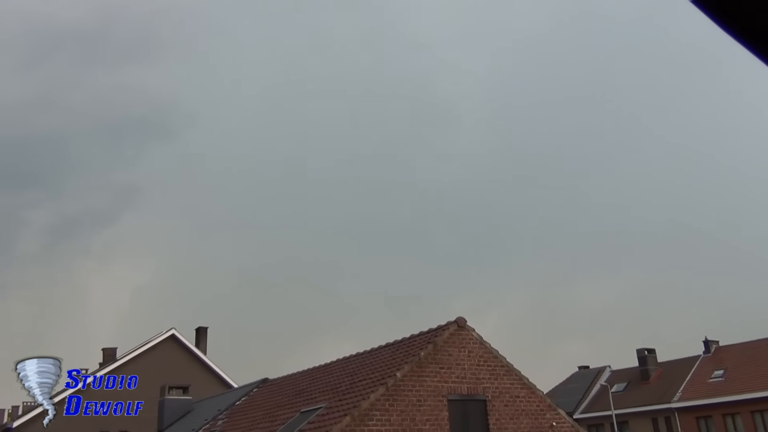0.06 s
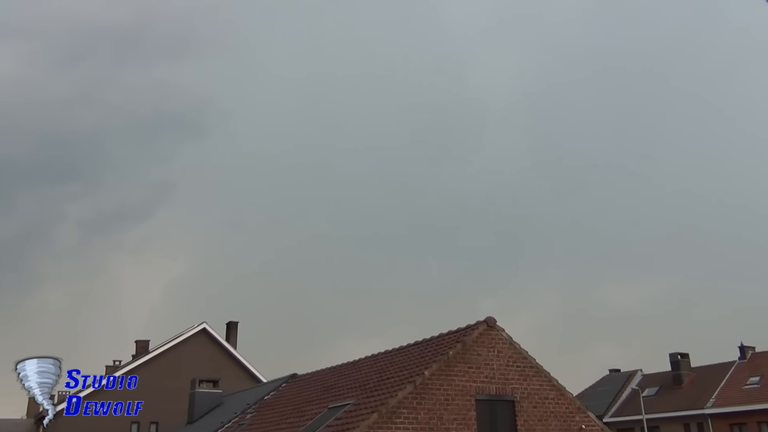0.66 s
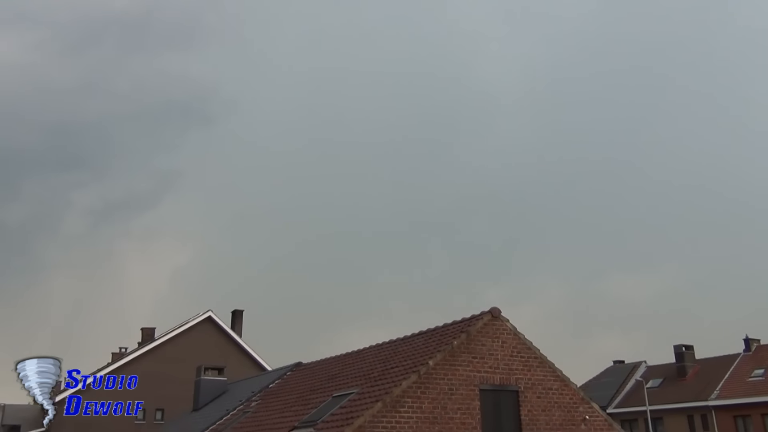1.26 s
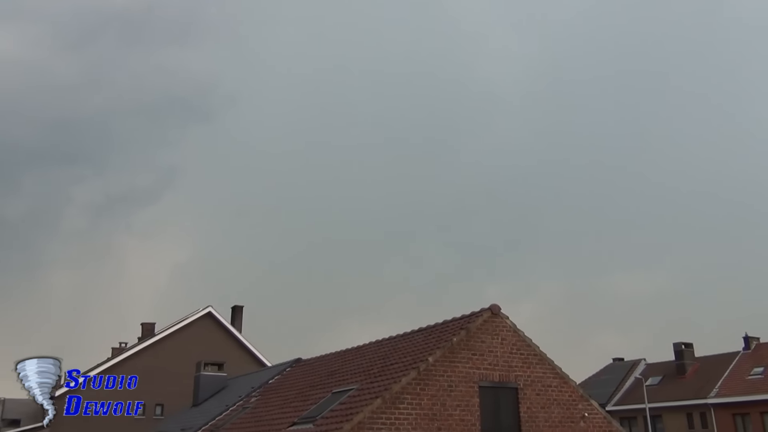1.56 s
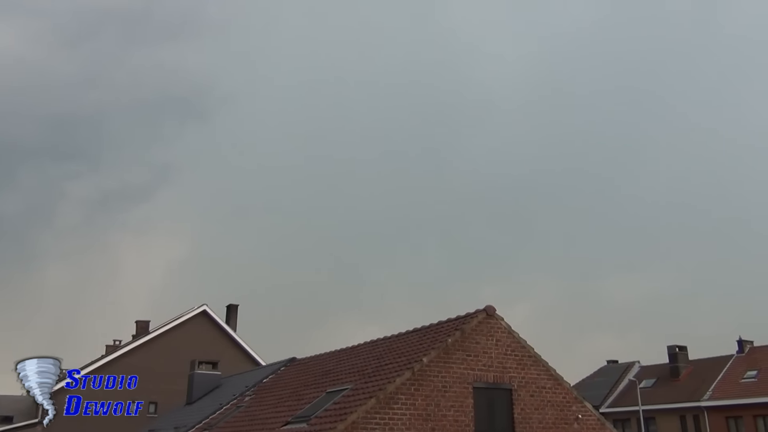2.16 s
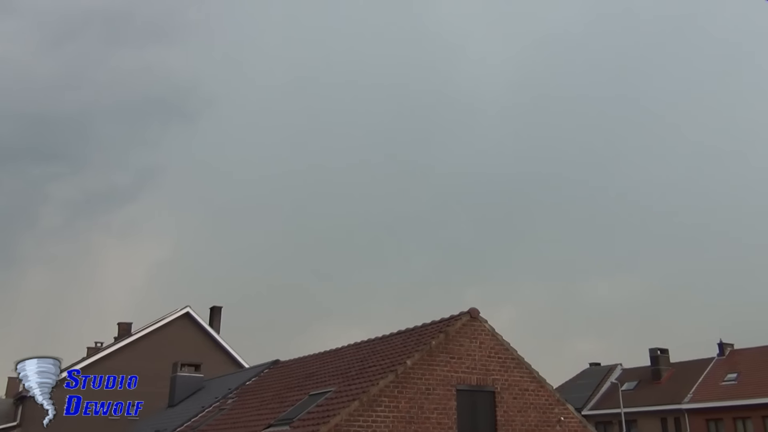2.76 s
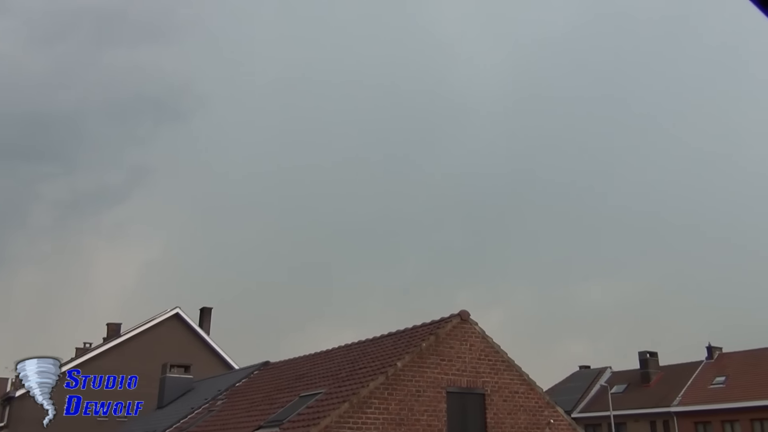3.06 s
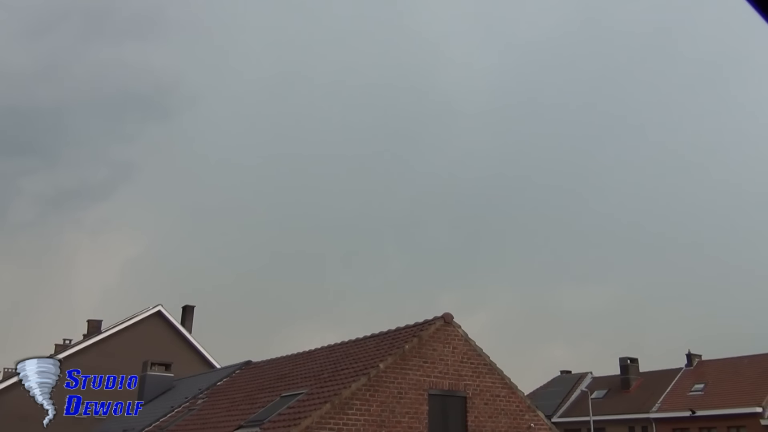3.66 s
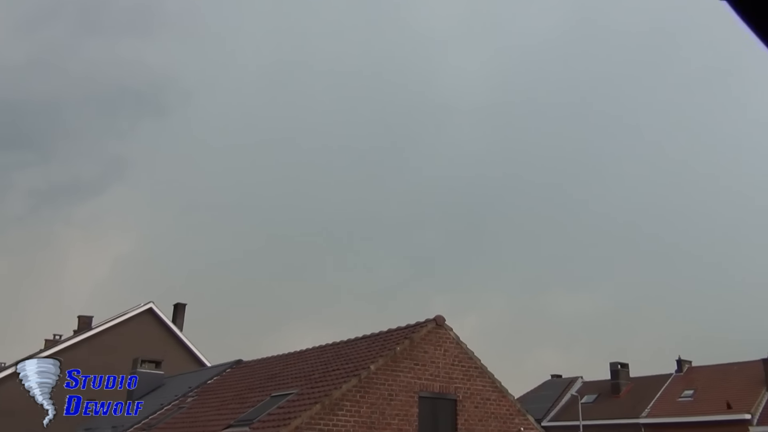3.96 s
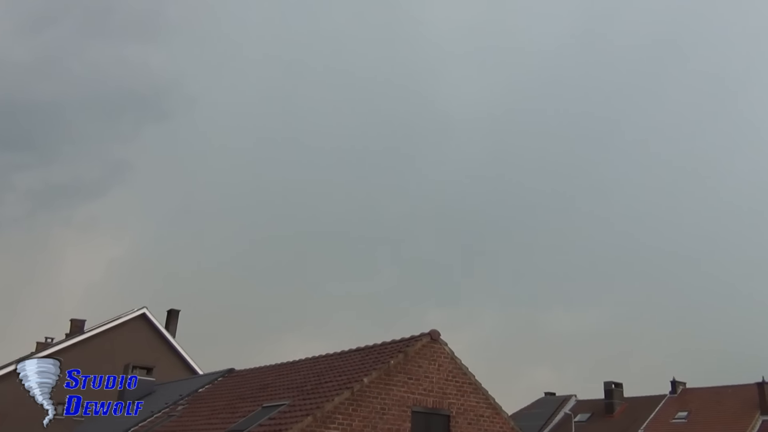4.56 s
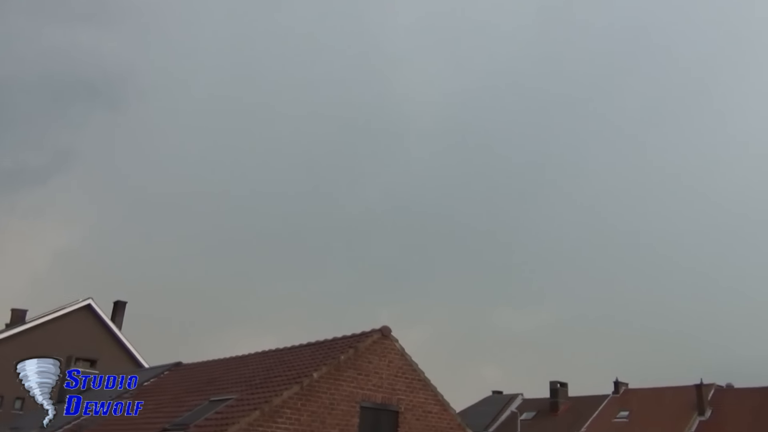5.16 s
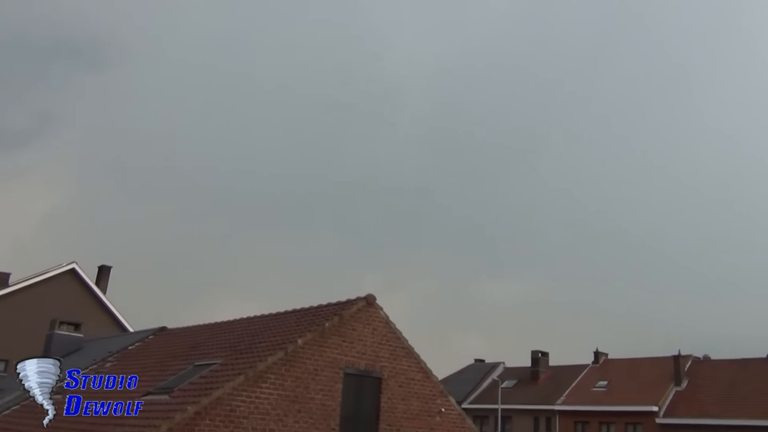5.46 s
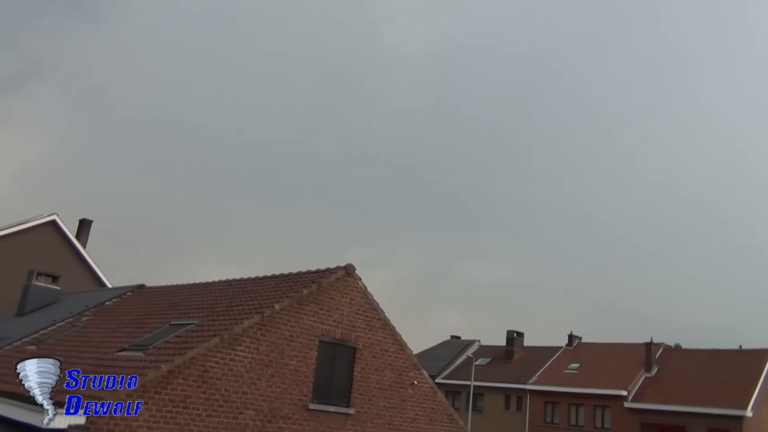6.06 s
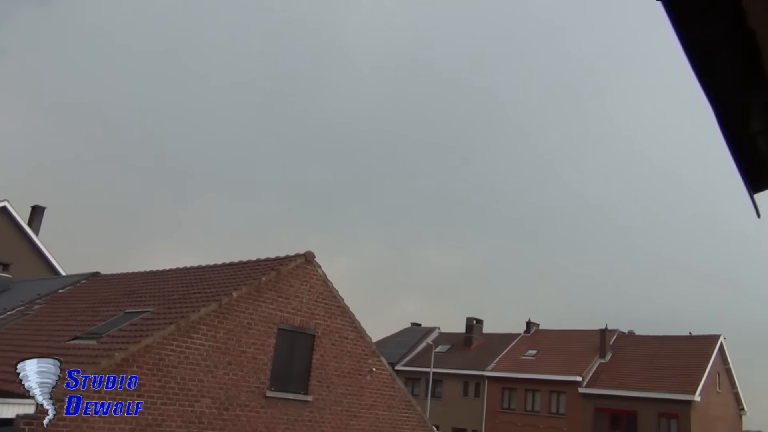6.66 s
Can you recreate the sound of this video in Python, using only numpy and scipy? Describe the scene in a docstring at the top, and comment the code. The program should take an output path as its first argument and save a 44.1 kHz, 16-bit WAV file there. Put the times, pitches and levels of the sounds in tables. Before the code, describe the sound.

Thunder cracks and rolls on in deep, booming waves, with a faint hiss of rain and a few close drops near the end.

```python
"""Thunder rolls on over the rooftops after a clap, heard from under an eave.
First the near parts of the bolt crack and tear. Shock fronts from ever farther parts follow in rolls,
each a boom, a roar and a rattle; the yard throbs, and absorption in the air takes away the edge.
After three seconds a faint hiss of rain becomes audible under the thunder, and near the end
a few drops tick close by."""
import sys
import numpy as np
from scipy import signal
from scipy.fft import rfft, irfft, next_fast_len
from scipy.io import wavfile
from scipy.ndimage import uniform_filter1d, minimum_filter1d

SR = 44100
rng = np.random.default_rng(int(sys.argv[2]) if len(sys.argv) > 2 else 0)


def inscribe(sig):
    """Save sig as 16-bit PCM at rate SR to the path in sys.argv[1].

    A 1-D sig is mono; a 2-D sig holds one channel per row.
    Samples are clipped to [-1, 1] before scaling.
    """
    pcm = np.round(np.clip(np.atleast_2d(sig).T, -1, 1) * 32767)
    wavfile.write(sys.argv[1], SR, pcm.astype(np.int16))


N = 304334
TIME = np.arange(N) / SR

# Rolls, one for each stretch of the bolt heard side-on.
# Each row: start and hold in seconds, then relative levels of boom, roar and rattle in dB.
SIDE_ON_ROLLS = [(0, 0.0072, -21, -38, -25), (0.152, 0.15, -18, -24.5, -51), (0.272, 0.16, -20.5, -19, -29),
                 (0.411, 0.16, -14.5, -22, -36), (0.603, 0.034, -26, -25.5, -29),
                 (0.705, 0.028, -30, -23, -29.5), (0.768, 0.039, -16.5, -31.5, -30),
                 (1.013, 0.04, -18, -35, -31.5), (1.175, 0.053, -16, -20, -32),
                 (1.305, 0.083, -20.5, -28, -40), (1.379, 0.1, -23.5, -20.5, -33),
                 (1.532, 0.028, -24.5, -21.5, -50), (1.613, 0.075, -20.5, -24, -34),
                 (1.755, 0.018, -18, -41.5, -51.5), (1.813, 0.12, -17.5, -24.5, -34.5),
                 (1.991, 0.099, -16, -26.5, -35), (2.179, 0.044, -17, -33, -41),
                 (2.305, 0.02, -19, -28, -39), (2.46, 0.13, -23, -39, -47),
                 (2.541, 0.063, -35.5, -22, -31.5), (2.606, 0.053, -22.5, -20, -27.5),
                 (2.758, 0.028, -19, -39.5, -49), (2.916, 0.063, -17, -35, -38.5),
                 (3.234, 0.072, -22, -28, -38), (3.369, 0.082, -20, -28.5, -40.5),
                 (3.74, 0.11, -23, -27, -39), (3.893, 0.094, -24.5, -25.5, -44),
                 (4.101, 0.062, -21.5, -32, -36.5), (4.319, 0.11, -19.5, -21.5, -36.5),
                 (4.638, 0.045, -26, -25, -46), (4.798, 0.052, -17, -24, -40),
                 (4.939, 0.12, -15.5, -20, -33.5), (5.157, 0.055, -19.5, -24.5, -51),
                 (5.283, 0.022, -18, -22.5, -37), (5.427, 0.038, -25, -18.5, -53),
                 (5.614, 0.013, -15.5, -23, -35.5), (5.742, 0.21, -25, -27, -41),
                 (6.15, 0.073, -17, -23.5, -36), (6.285, 0.004, -15, -21, -49),
                 (6.608, 0.17, -16.5, -19, -34), (6.73, 0.15, -18.5, -26, -47.0)]
# Envelopes of boom, roar and rattle, in that order. Each row: attack and release in seconds.
ROLL_ENVELOPES = [(0.022, 0.042), (.01, 0.037), (0.0096, 0.026)]
# Rumble between the rolls. Each row: time in seconds, relative levels of boom, roar and rattle in dB.
STEADY_RUMBLE = [(0, -20.5, -19, -36.5), (0.4, -19.5, -27, -31.5), (1.1, -17.5, -23.5, -31.5),
                 (1.6, -21, -26, -36), (2.4, -27, -26.5, -37.5), (2.8, -18.5, -22.5, -36),
                 (3.17, -25.5, -31.5, -38.5), (3.65, -25, -29, -39), (4.5, -23.5, -24.5, -38),
                 (5.75, -21, -22.5, -36), (6.5, -25.5, -21.5, -36), (6.9, -23, -24, -35.5)]
# Recession of the thunder. Each row: time in seconds, share of far sound from 0 to 1.
FAR_SHARE = [(0, 0), (1.2, 0.25), (2.4, 0.31), (3.4, 0.59), (6.9, 0.45)]
# Resonances between the house walls. Each row: frequency in Hz, width in Hz, gain in dB.
YARD_MODES = [(109.2, 30, 3.5), (201.3, 88, 4.5), (245, 97, -1.5), (400.2, 7.6, 7), (494.2, 52, 8.5),
              (657, 170, 1.5)]
# Ringing of the two lowest resonances. Each row: start and hold in seconds, lower and upper level in dB.
YARD_THROBS = [(1.413, 0.021, -17.5, -14), (1.489, .035, -27.5, -17), (1.541, 0.044, -16, -14.5),
               (1.631, 0.049, -23.5, -19.5), (1.759, 0.046, -24, -18.5), (1.831, 0.082, -24, -18),
               (1.932, 0.035, -14, -20), (2.018, 0.11, -20, -19), (2.198, 0.071, -23, -18.5),
               (2.304, 0.033, -21.5, -16.5), (2.501, 0.044, -22.5, -18), (2.606, 0.062, -25, -16.5),
               (2.76, 0.052, -16.5, -17.5), (2.924, 0.035, -22, -14)]
# Stretches of evenly spaced fronts.
# Each row: start and length in seconds, first pitch, last pitch and width in Hz, level in dB.
PITCHED_SWELLS = [(0, 0.07, 168, 165, 23, -15), (0.03, 0.14, 592, 482.5, 65, -25),
                  (0.176, 0.13, 279.8, 304.7, 36.75, -17.5), (.25, .12, 153, 160.3, 24.86, -14.5),
                  (.37, .21, 128.6, 123.4, 25.2, -14), (0.413, 0.092, 238.6, 267.6, 56.3, -15),
                  (.595, .1, 130.6, 123, 25.2, -17.5), (0.609, .09, 268, 265, 32.2, -19.5),
                  (0.818, .14, 129.4, 111.2, 22.2, -14.5), (.78, .25, 158.7, 193.2, 34.6, -17.5),
                  (.97, .11, 128, 110.7, 25.2, -16), (4.31, 0.33, 502, 495, 45, -25),
                  (4.332, .26, 565, 545, 80, -25), (4.94, .12, 540, 484, 45, -21),
                  (5.0, 0.13, 214, 240.5, 38, -18.5), (5.39, 0.092, 504, 499, 35, -25),
                  (5.431, 0.14, 249, 210, 32.1, -18.5), (5.67, 0.081, 512, 515.5, 25.8, -22),
                  (5.602, 0.16, 1350, 1342, 35.2, -42), (5.615, 0.16, 1244, 1253, 40, -36.5),
                  (5.74, .12, 1265, 1265, 80, -31.5), (5.892, .06, 1240, 1256, 50, -40),
                  (5.77, .15, 191.2, 234.7, 39.8, -19), (6.002, 0.055, 802, 801, 25.04, -24),
                  (6.026, 0.1, 895, 879, 70.5, -28), (6.385, 0.12, 798, 800, 35.3, -27),
                  (6.689, 0.23, 290.4, 265.6, 61.7, -22)]
# Single heavy fronts. Each row: start in seconds, level in dB, final pitch in Hz.
HEAVY_FRONTS = [(0.155, -14.5, 77.3), (0.226, -16, 79.3), (0.286, -13.5, 67), (0.399, -13.5, 68.4),
                (0.773, -12, 58), (0.872, -11, 69), (0.95, -13.5, 74.8), (1.189, -14, 69.3),
                (1.42, -20.5, 66.2), (2.925, -22.5, 66.2), (3.82, -24, 69.6), (3.97, -22.5, 74.9),
                (4.955, -21.5, 58), (5.275, -6.5, 106), (5.54, -7.5, 188), (6.767, -10.5, 106)]
# Sharp fronts, dull knocks and close drops. Each row: start in seconds, relative peak level in dB.
SHARP_FRONTS = [(0.2515, -16), (0.2895, -10), (0.3055, -16), (0.336, -8), (0.347, -11.5), (0.4398, -13.5),
                (0.4677, -20.5), (0.4947, -10.5), (0.5445, -15), (0.555, -13.5), (0.6478, -15),
                (0.7175, -18), (0.7757, -10.5), (0.7839, -13.5), (0.8124, -15.5), (0.8339, -15),
                (0.8785, -13.5), (0.8992, -18.5), (1.1801, -17), (1.2046, -14.5), (1.3572, -21),
                (1.419, -13), (1.635, -23), (1.8855, -14.5), (2.622, -13.5), (2.638, -20), (2.932, -14.5),
                (2.943, -16), (4.958, -14.5), (6.638, -15)]
DULL_KNOCKS = [(0.24, -8), (0.311, -5.5), (0.549, -9.5), (0.617, -7), (1.172, -10.5), (3.091, -17.5),
               (3.212, -17), (4.264, -9), (4.464, -7.5), (4.555, -8), (4.568, -14), (4.633, -9),
               (4.937, -13), (5.109, -8), (5.279, -10.5), (6.022, -11.5), (6.532, -16.5), (6.591, -12.5)]
CLOSE_DROPS = [(5.947, -29.5), (6.179, -21), (6.4195, -24.5), (6.4997, -18), (6.5542, -26)]
# Bursts of tearing and brief swells of bright hiss.
# Each row: start and hold in seconds, relative level in dB.
TEAR_BURSTS = [(.247, 0.027, -45), (.285, 0.042, -44), (.332, 0.05, -46.5), (0.49, 0.07, -49.5),
               (.612, 0.03, -55), (.773, 0.014, -39)]
HISS_SWELLS = [(3.06, 0.16, -67), (3.46, 0.26, -65), (4.17, 0.13, -57.5), (4.69, 0.083, -60.5),
               (5.08, 0.19, -54.5), (5.3, 0.12, -49), (5.66, 0.13, -59), (5.85, 0.83, -60),
               (6.83, 0.053, -57)]
# The background hiss, audible after three seconds. Each row: time in seconds, relative level in dB.
HISS_LEVEL = [(0, -95.5), (2.98, -78), (3.1, -62), (4.1, -53.5), (5.6, -55.5), (6.0, -53), (6.9, -50.5)]
# Spectra of the near and far parts of the bolt and of the other sounds.
# Each row: frequency in Hz, relative level in dB.
NEAR_SPECTRUM = [(20, -30.5), (40, -20.5), (60, -12), (82, -8), (115, -2.5), (200, -3), (310, -3.5),
                 (480, -18.5), (750, -17), (1300, -31), (2000, -37), (3000, -42.5), (6000, -93)]
FAR_SPECTRUM = [(20, -24), (48, -5.5), (78, -8.5), (105, 1.5), (210, 3), (330, -7.5), (500, -9), (700, -10),
                (1250, -21.5), (1600, -28), (3000, -52), (6000, -100)]
CRACK_SPECTRUM = [(200, -14), (700, 5), (1300, -3), (2000, -9), (2800, -16), (4000, -20), (5500, -32),
                  (7000, -55.5), (9000, -76.5)]
KNOCK_SPECTRUM = [(150, -17), (490, 8.5), (800, -3.5), (1400, -19.5), (3000, -49.5), (6000, -96)]
DROP_SPECTRUM = [(500, 0.5), (1700, -0.5), (2400, 2), (4000, -1), (6500, -2), (9500, -3.5), (12000, -10.5)]
RAIN_SPECTRUM = [(300, 12.5), (2000, 9), (3200, 9), (4500, 2.5), (6500, -4.5), (9500, -8), (11000, -13.5)]
HISS_SPECTRUM = [(1500, -14.5), (4000, -3.5), (7500, -2.5), (11000, -7.5)]
# Likeness of left and right. Each row: frequency in Hz, coherence from 0 to 1.
COHERENCE = [(60, .98), (120, .98), (250, .94), (520, .92), (1000, .87), (2000, .8), (6000, .56)]
# Phase between the channels. Each row: frequency in Hz, lead of the left in radians.
LEFT_LEAD = [(30, .13), (120, .53), (250, .68), (550, .47), (1200, .2), (2800, .1)]
# Balance of the channels. Each row: time in seconds, left minus right in dB.
BALANCE = [(0, -3), (6.9, -1.3)]


def thunder():
    """Superposition of shock fronts: low ones merge into booms; high ones stay apart and rattle."""
    boom_level, roar_level, rattle_level = roll_level(0), roll_level(1), roll_level(2)
    shudder = register(impulses(980, 2.9, wash=.49), 3.8, 85, span_s=.23) * gain_of(-13)
    boom = register(impulses(700, 2.73, wash=.52), 85, 353, span_s=.054) * gain_of(-1.17)
    # Direct fronts stay sharp above a wash that has come by many paths.
    direct = impulses(260, 3.1, wash=.14)
    roar_wash = multipath(impulses(900, 2.1, wash=1), depth_db=3.5)
    roar = register(direct + 1.5 * roar_wash, 355.6, 1133, span_s=.053) * gain_of(-1.21)
    rattle_wash = multipath(impulses(700, 3, wash=.6), depth_db=3)
    rattle = register(direct + 1.1 * rattle_wash, 1086, 2500, span_s=.15) * gain_of(-1.43)
    rolls = (shudder + boom) * boom_level + roar * roar_level + rattle * rattle_level
    return rolls + tearing(rattle_level)


def roll_level(band):
    """Incoherent rolls and rumble add in power; the root is the amplitude (0 boom, 1 roar, 2 rattle)."""
    rolls = [(start, hold, levels[band]) for start, hold, *levels in SIDE_ON_ROLLS]
    rumble = gain_of(over_time(STEADY_RUMBLE, column=band + 1))
    return np.hypot(surges(rolls, *ROLL_ENVELOPES[band]), rumble)


def register(fronts, low_hz, high_hz, span_s):
    """Air absorption and resonance between the walls colour one band of the thunder, at unit level."""
    def heard_with(spectrum):
        def gain_at(hz):
            walls_db = sum(db / (1 + (2 * (hz - mode) / width) ** 2) for mode, width, db in YARD_MODES)
            band_loss = (1 + (low_hz / (hz + 1)) ** 12) * (1 + (hz / high_hz) ** 12)
            return gain_of(over_frequency(spectrum, hz) + walls_db) / np.sqrt(band_loss)
        return filtered(fronts, gain_at)
    far = over_time(FAR_SHARE)
    return steadied((1 - far) * heard_with(NEAR_SPECTRUM) + far * heard_with(FAR_SPECTRUM), span_s)


def multipath(fronts, depth_db):
    """Interference: fronts from many paths cancel and reinforce in drifting patches of frequency."""
    frames = dict(nperseg=2048, noverlap=1536)
    spectrogram = signal.stft(fronts, **frames)[2]
    patches = rng.standard_normal(spectrogram.shape[1:])
    patches = uniform_filter1d(uniform_filter1d(patches, size=4, axis=0), size=7, axis=1)
    return signal.istft(spectrogram * gain_of(depth_db * patches / patches.std()), **frames)[1][:, :N]


def tearing(rattle_level, loss_db_per_s=7):
    """Near parts of the bolt crackle in bursts and on the rattle; absorption grows with the path."""
    crackle = coloured(impulses(1600, 3, wash=.55), CRACK_SPECTRUM)
    crackle = signal.sosfilt(signal.butter(6, 2400, "high", fs=SR, output="sos"), crackle)
    dulled = signal.sosfilt(signal.butter(12, 4000, fs=SR, output="sos"), crackle)
    edge = rattle_level * gain_of(-19.5 - loss_db_per_s * TIME)
    bursts = surges(TEAR_BURSTS, attack_s=.004, release_s=.016)
    return steadied(dulled, span_s=.075) * edge + steadied(crackle, span_s=.082) * bursts


def blows(rows, spectrum, scatter, decay_s, loss_db_per_s=0, loss_per_db=0, size=8192):
    """Scattering: each crack, knock or drop is one front with a short train of decaying echoes."""
    t, out = np.arange(size) / SR, np.zeros((2, N))
    loudest_db = max(db for _, db in rows)
    for start, peak_db in rows:
        echoes = rng.standard_normal((2, size)) * np.exp(-t / decay_s)
        echoes *= scatter / np.linalg.norm(echoes[0])
        echoes[0, 0] += 1  # the direct front
        # Loss at 4 kHz, where set: later and weaker fronts have crossed more air.
        loss_db = loss_db_per_s * start + loss_per_db * (loudest_db - peak_db)
        blow = filtered(
            echoes, lambda hz: gain_of(over_frequency(spectrum, hz) - loss_db * (hz / 4000) ** 4))
        add(out, start, gain_of(peak_db) * blow / abs(blow[0]).max())
    return stereo(out)


def thumps(rise_cycles=.87, sag=.26):
    """Damped oscillation: a heavy front swells within about a cycle and sinks in pitch as it dies."""
    t, out = np.arange(SR // 4) / SR, np.zeros((2, N))
    for start, db, hz in HEAVY_FRONTS:
        age = hz * t / rise_cycles
        turns = np.cumsum(hz * (1 + sag * np.exp(-age))) / SR + rng.random()
        add(out[0], start, gain_of(db) * age * np.exp(1 - age) * np.sin(2 * np.pi * turns))
    return stereo(out)


def swells():
    """Repetition pitch: evenly spaced fronts give a narrow band that glides as their spacing changes."""
    out = np.zeros((2, N))
    for start, length, first_hz, last_hz, width_hz, db in PITCHED_SWELLS:
        count = int(length * SR)
        band = narrow_band(np.geomspace(first_hz, last_hz, count), width_hz, size=SR)
        add(out, start, gain_of(db) * band * signal.windows.tukey(count, .5))
    return stereo(out)


def throbs(width_hz=31):
    """Resonance: the two lowest modes of the yard swell together under a roll and quickly die."""
    out = np.zeros((2, N))
    for mode, (hz, _, _) in enumerate(YARD_MODES[:2]):
        events = [(start, hold, levels[mode]) for start, hold, *levels in YARD_THROBS]
        envelope = surges(events, attack_s=.02, release_s=.034)
        out += envelope * narrow_band(np.full(N, hz), width_hz, size=N)
    return stereo(out)


def rain(amplitude, spectrum, rustle_db=1.5, rustle_s=.05):
    """Shot noise: thousands of far drops blur into a hiss whose level rustles at random."""
    hiss = steadied(coloured(impulses(5000, 4.9, wash=2.7), spectrum), span_s=.15)
    rustle = smoothed(rng.standard_normal(N), rustle_s)
    return hiss * amplitude * gain_of(2.5 + rustle_db * rustle / rustle.std())


def impulses(per_s, spread_db, wash):
    """A Poisson process: random impulses of uneven size over a wash of countless faint ones."""
    sizes = gain_of(spread_db * np.minimum(rng.exponential(1, (2, N)), 4))
    clicks = sizes * rng.choice([-1, 1], (2, N)) * (rng.random((2, N)) < per_s / SR)
    return stereo(clicks / clicks.std() + wash * rng.standard_normal((2, N)))


def narrow_band(hz, width_hz, size):
    """Random modulation spreads a pitch curve into a band; its phase wanders more than its strength."""
    lowpass = signal.butter(2, width_hz / 2, fs=SR, output="sos")
    noise = rng.standard_normal((2, size)) + 1j * rng.standard_normal((2, size))
    waver = signal.sosfilt(lowpass, noise)[:, -len(hz):]
    waver /= (abs(waver) ** 2 + .1 * waver.var()) ** .35  # evens out the strength
    band = (waver * np.exp(2j * np.pi * np.cumsum(hz) / SR)).real
    return band / band.std(1, keepdims=True)


def surges(events, attack_s, release_s):
    """Power summation gives the joint amplitude of events that rise, hold and decay exponentially."""
    power = np.zeros(N)
    for start, hold, db in events:
        t = np.arange(0, hold + .4, 1 / SR)
        envelope = np.minimum(t / attack_s, 1) * np.exp(-np.maximum(t - hold, 0) / release_s)
        add(power, start, (gain_of(db) * envelope) ** 2)
    return np.sqrt(power)


def stereo(pair):
    """Partial coherence: a shared and a scattered signal become left and right, the left leading."""
    size = next_fast_len(N + 4096)
    hz = np.fft.rfftfreq(size, 1 / SR)
    shared, scattered = rfft(pair, size)
    coherence = over_frequency(COHERENCE, hz)
    turn = np.exp(.5j * over_frequency(LEFT_LEAD, hz))
    mid, side = shared * np.sqrt((1 + coherence) / 2), scattered * np.sqrt((1 - coherence) / 2)
    return irfft([(mid + side) * turn, (mid - side) / turn], size)[:, :N]


def filtered(pair, gain_at, size=8192):
    """A minimum-phase filter keeps fronts sharp and puts the ringing behind them."""
    gain = np.maximum(gain_at(abs(np.fft.fftfreq(size, 1 / SR))), 1e-6)
    response = np.exp(np.conj(signal.hilbert(np.log(gain))))
    taps = np.fft.ifft(response).real[:size // 2]
    return signal.oaconvolve(pair, taps[None], axes=1)[:, :pair.shape[1]]


def coloured(pair, spectrum):
    """Linear filtering imposes a tabulated spectrum."""
    return filtered(pair, lambda hz: gain_of(over_frequency(spectrum, hz)))


def steadied(pair, span_s):
    """Division by the running RMS holds the mean of two channels near unit level."""
    power = smoothed(pair.mean(0) ** 2, span_s)
    return pair / np.sqrt(abs(power) + 1e-20)


def smoothed(x, span_s):
    """Two moving averages remove fast fluctuations."""
    width = int(span_s * SR)
    return uniform_filter1d(uniform_filter1d(x, width), width)


def over_time(rows, column=1):
    """Linear interpolation of one column in time."""
    columns = np.transpose(rows)
    return np.interp(TIME, columns[0], columns[column])


def over_frequency(rows, hz):
    """Linear interpolation in log frequency."""
    row_hz, values = np.transpose(rows)
    return np.interp(np.log(hz + 1), np.log(row_hz + 1), values)


def gain_of(db):
    """Amplitude grows tenfold for every 20 dB."""
    return 10 ** (np.asarray(db) / 20)


def add(mix, start_s, sound):
    """Superposes a sound on the mix from the given time."""
    part = mix[..., round(start_s * SR):][..., :sound.shape[-1]]
    part += sound[..., :part.shape[-1]]


def scene():
    """Thunder and rain superpose; the storm is a little stronger on the right."""
    cracks = blows(SHARP_FRONTS, CRACK_SPECTRUM, scatter=2.2, decay_s=.0055,
                   loss_db_per_s=5.5, loss_per_db=.9)
    knocks = gain_of(-2.5) * blows(DULL_KNOCKS, KNOCK_SPECTRUM, scatter=1.5, decay_s=.007)
    drops = gain_of(1.5) * blows(CLOSE_DROPS, DROP_SPECTRUM, scatter=1.8, decay_s=.0018)
    peal = thunder() + swells() + throbs() + cracks + knocks + thumps()
    hiss = rain(gain_of(over_time(HISS_LEVEL)), RAIN_SPECTRUM)
    bright_hiss = rain(surges(HISS_SWELLS, attack_s=.03, release_s=.014), HISS_SPECTRUM)
    return (peal + drops + hiss + bright_hiss) * gain_of(np.array([[.5], [-.5]]) * over_time(BALANCE))


def record(dry, limit_db=-1.3, recovery_db_per_s=120, cutoff_hz=10750):
    """Peak limiting eases down the highest crests and lets go quickly; a low-pass bounds the treble."""
    over_db = np.maximum(20 * np.log10(abs(dry).max(0) + 1e-9) - limit_db, 0)
    recovery_db = recovery_db_per_s * TIME
    held_db = np.maximum.accumulate(over_db + recovery_db) - recovery_db
    ease = signal.windows.hann(301)
    gain_db = signal.oaconvolve(minimum_filter1d(-held_db, len(ease)), ease / ease.sum(), "same")
    lowpass = signal.firwin(511, cutoff_hz, window=("kaiser", 9), fs=SR)
    return signal.oaconvolve(dry * gain_of(gain_db), lowpass[None], "same")


dry = scene()
out = record(dry)
inscribe(out)
```